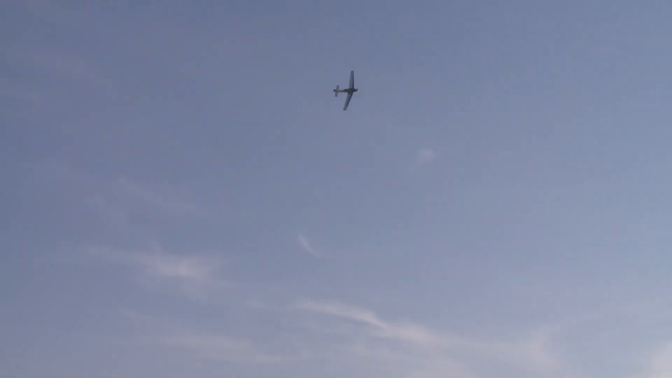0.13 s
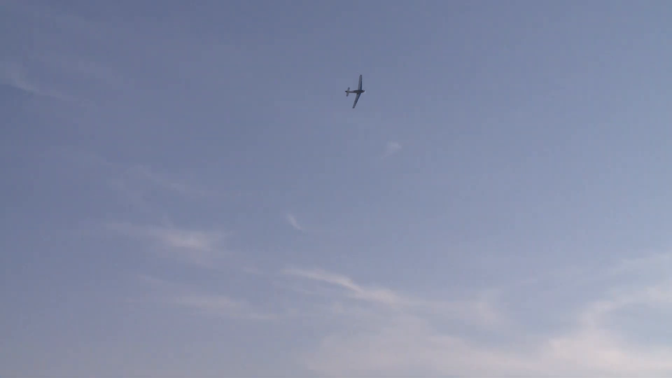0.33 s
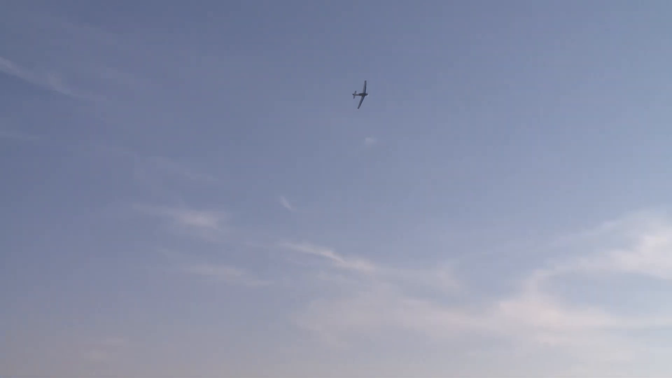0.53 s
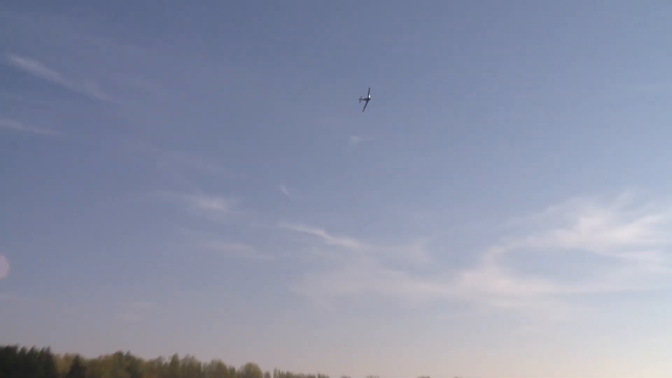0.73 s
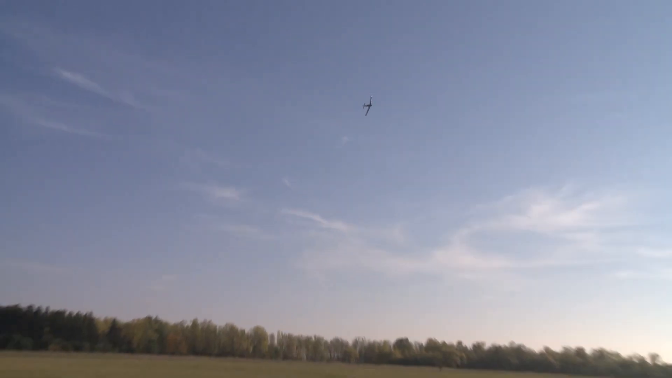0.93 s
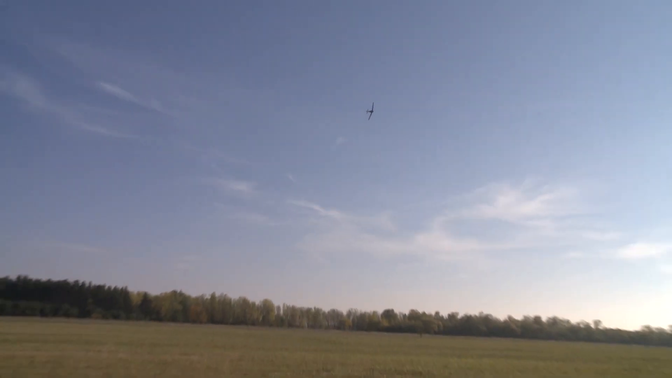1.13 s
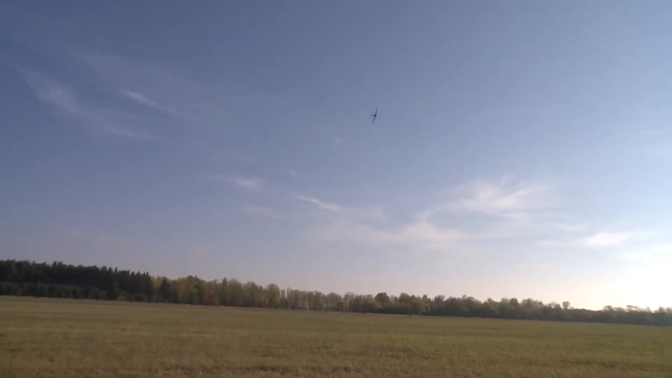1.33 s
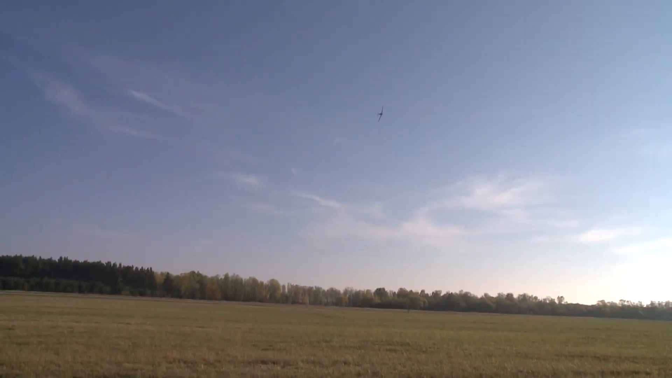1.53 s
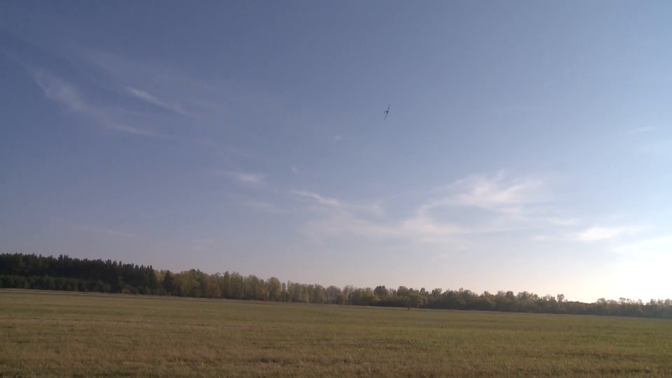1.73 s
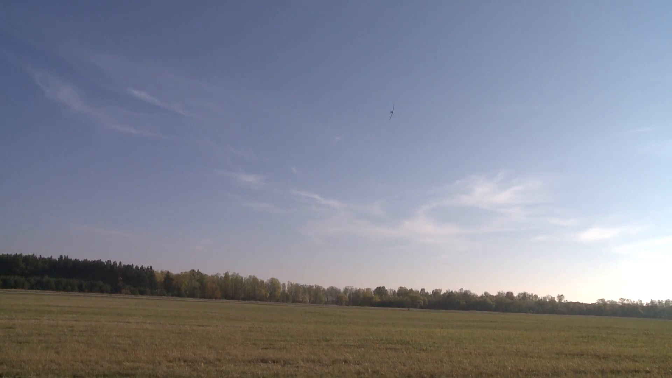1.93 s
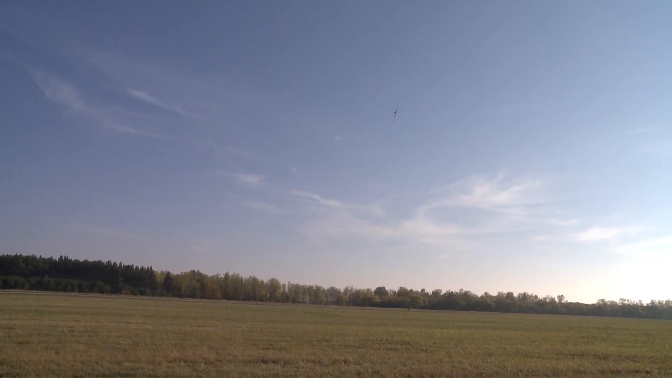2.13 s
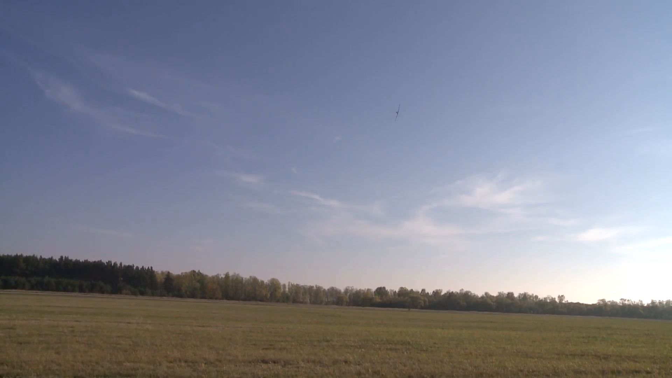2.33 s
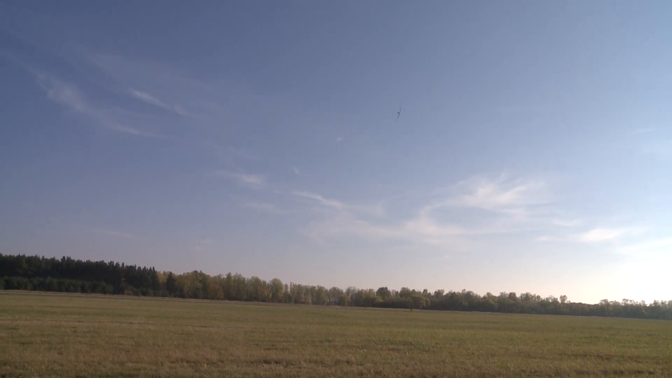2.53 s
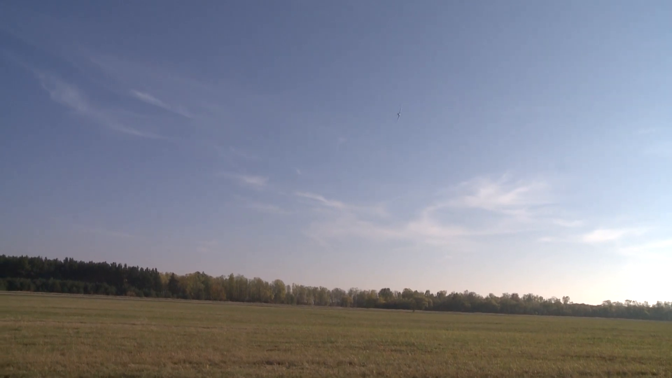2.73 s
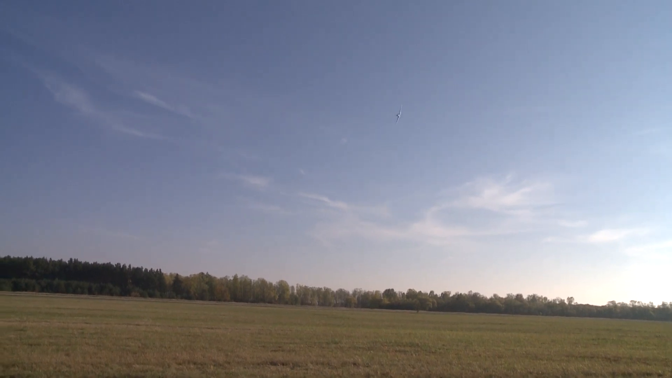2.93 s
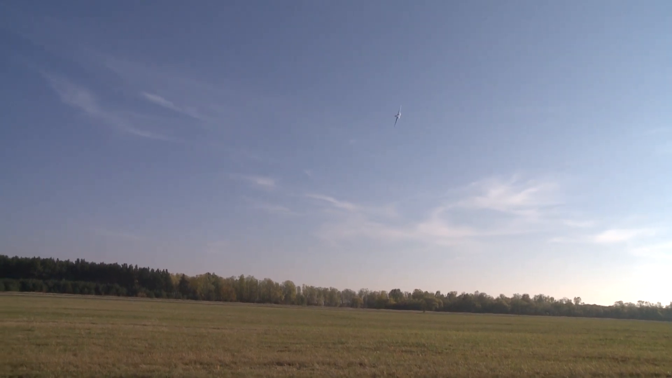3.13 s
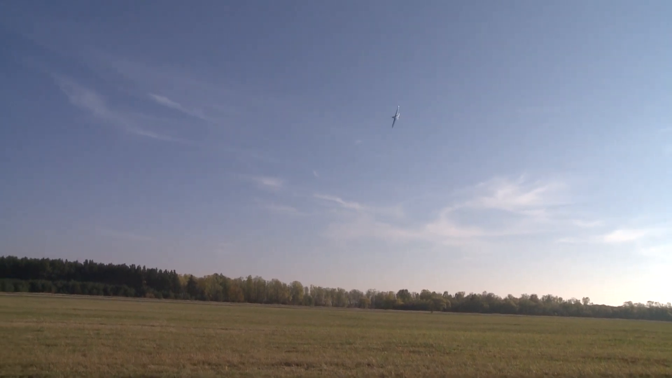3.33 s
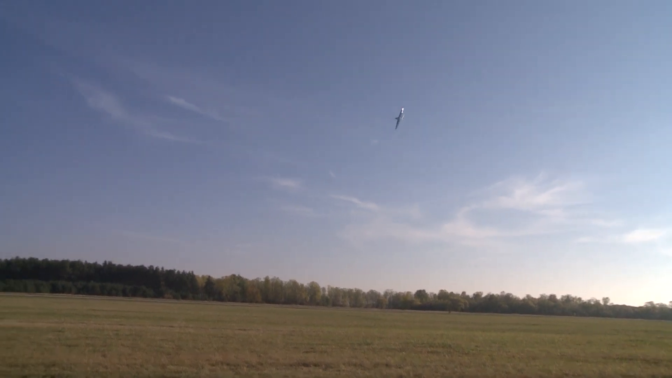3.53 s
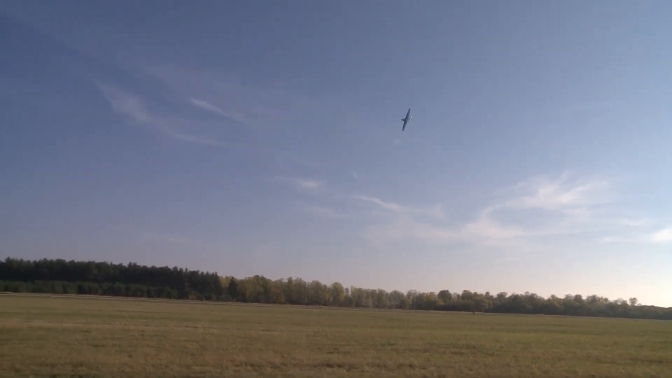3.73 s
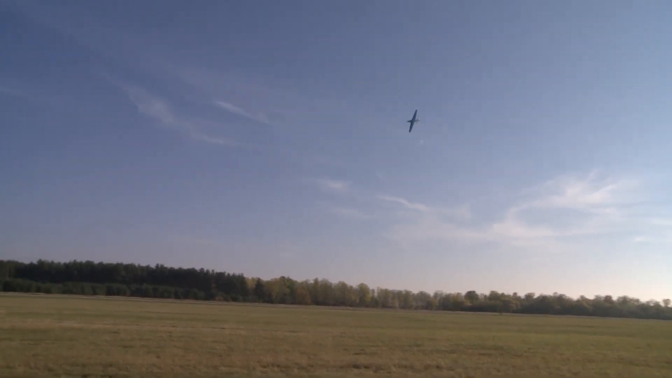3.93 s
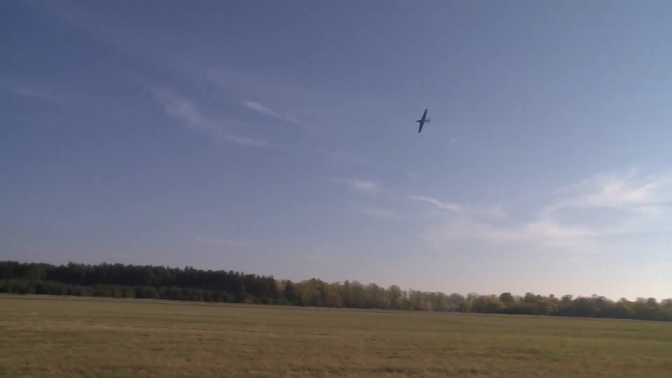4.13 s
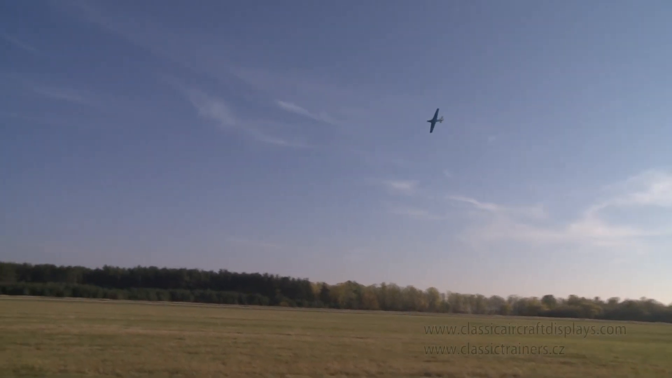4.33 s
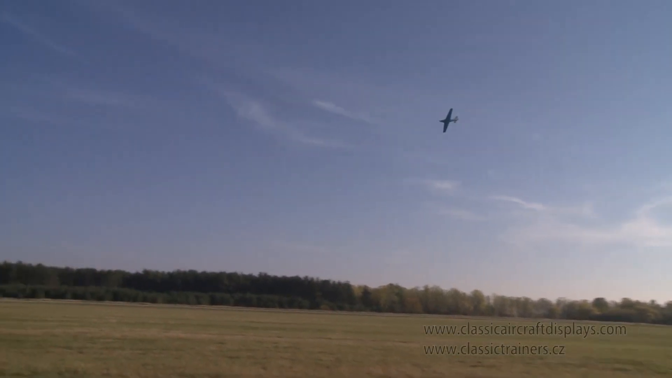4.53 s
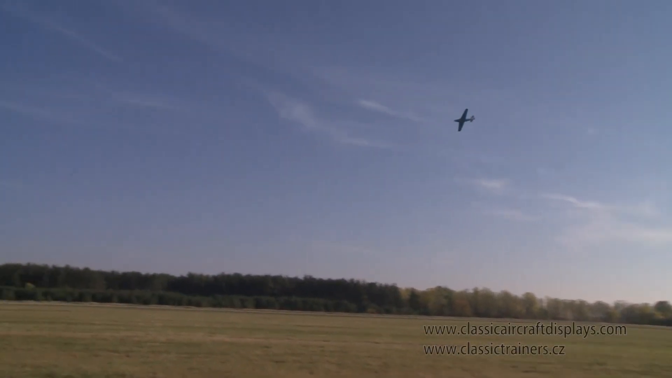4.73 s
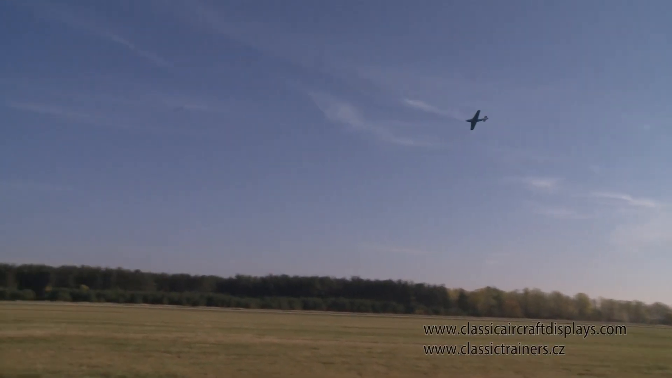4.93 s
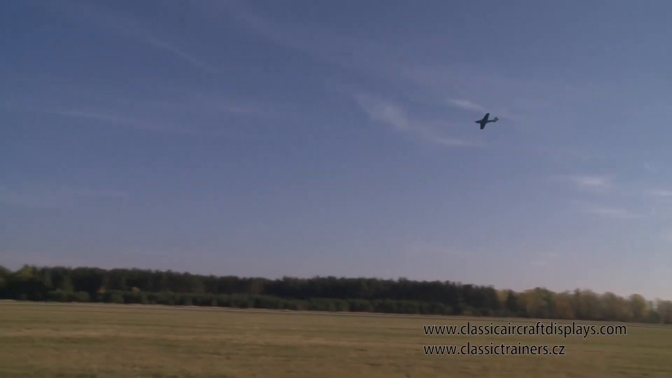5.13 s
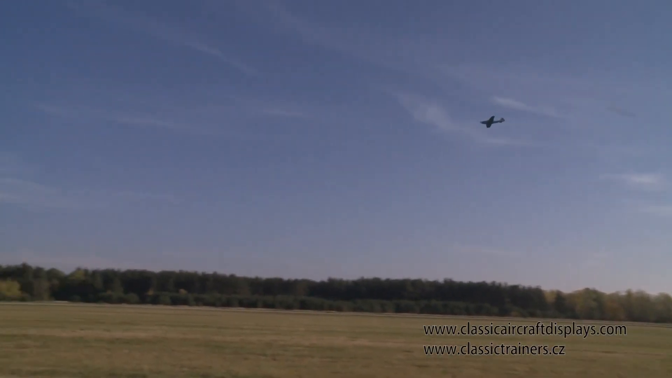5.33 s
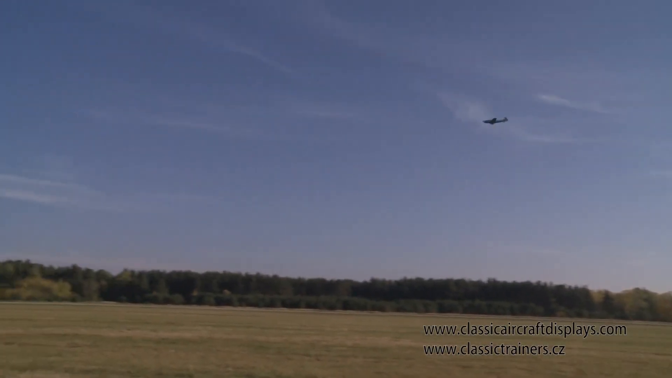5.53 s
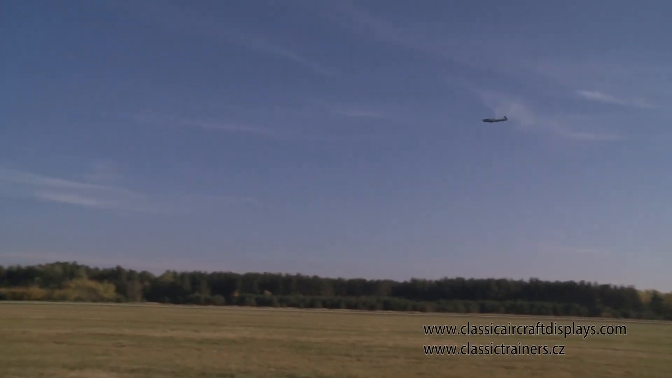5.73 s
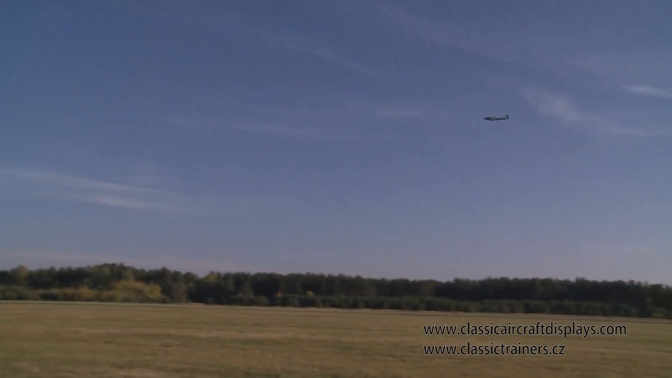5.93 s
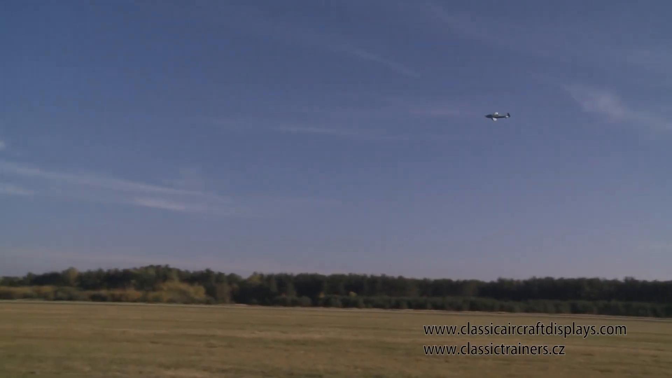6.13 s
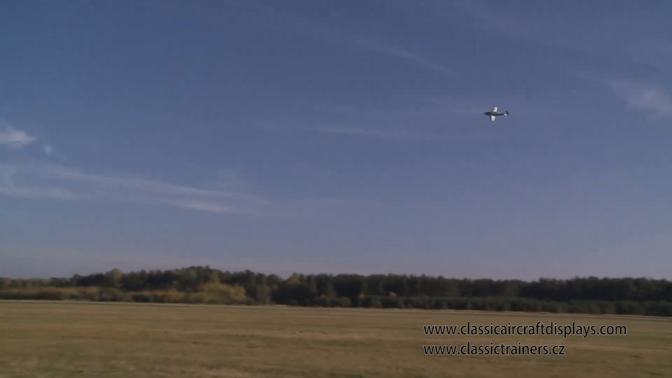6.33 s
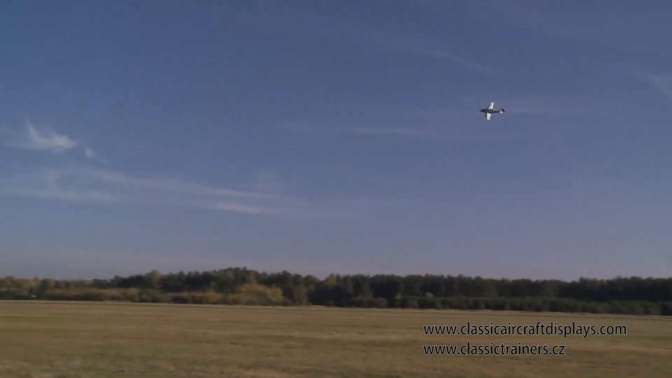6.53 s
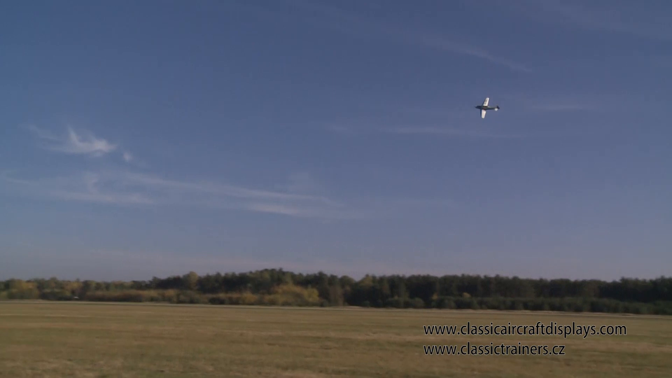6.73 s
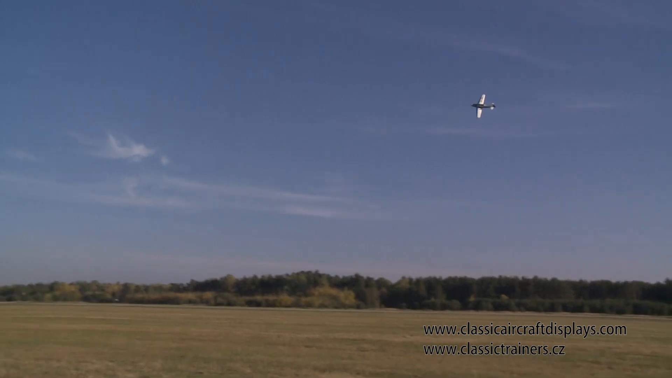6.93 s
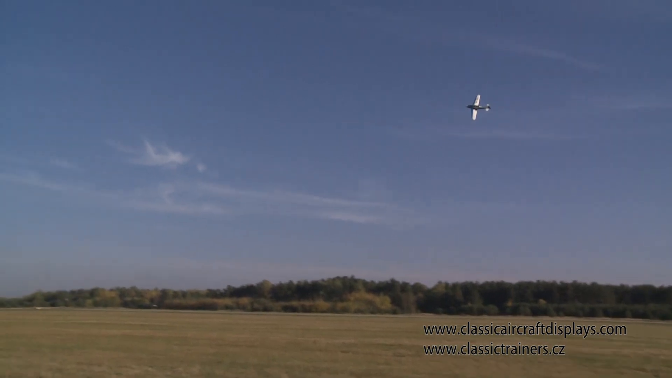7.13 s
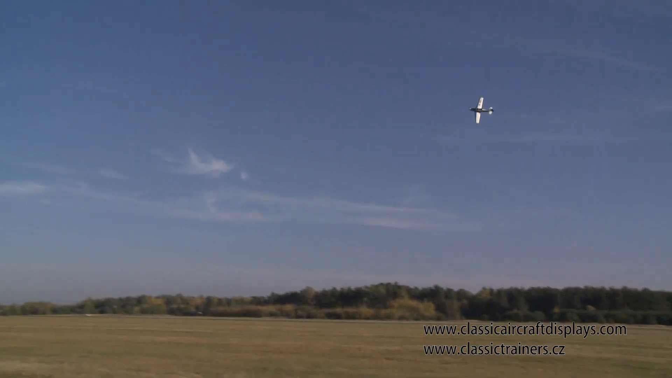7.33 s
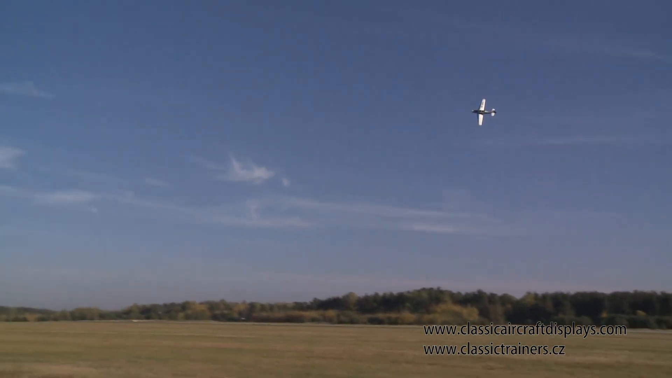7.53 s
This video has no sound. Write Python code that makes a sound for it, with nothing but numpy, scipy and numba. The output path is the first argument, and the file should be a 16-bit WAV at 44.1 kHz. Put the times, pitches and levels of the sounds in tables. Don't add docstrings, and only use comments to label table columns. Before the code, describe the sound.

Distant piston aircraft drone with rough exhaust roar rises in pitch and loudness, bangs sharply while flying past, then drops lower and eases away.

```python
import sys
import numpy as np
from scipy import signal
from scipy.io import wavfile
from numba import njit

SR = 44100
rng = np.random.default_rng(int(sys.argv[2]) if len(sys.argv) > 2 else 0)


def dump(signal):
    limited = np.clip(np.atleast_2d(signal).T, -1, 1)
    pcm = np.round(limited * 32767).astype(np.int16)
    wavfile.write(sys.argv[1], SR, pcm)


def voltage_ratio(decibels):
    exponent = np.asarray(decibels, float) / 20
    return 10 ** exponent


N = 339570


def rms_one(x):
    return x / np.sqrt(np.mean(x ** 2) + 1e-20)


def in_time(rows):
    s, *columns = np.transpose(rows)
    return [np.interp(np.arange(N) / SR, s, c) for c in columns]


def drift(rate_hz):
    r = np.exp(-80 * np.pi * rate_hz / SR)
    slow = signal.lfilter([1], [1, -2 * r, r * r], rng.standard_normal(N // 40 + 2002))
    slow = slow[2000:]
    return np.interp(np.arange(N) / 40, np.arange(len(slow)), rms_one(slow))


def band(x, low_hz, high_hz):
    return signal.sosfilt(signal.butter(3, [low_hz, high_hz], "band", fs=SR, output="sos"), x)


def delayed(x, ms):
    return np.interp(np.arange(N) - ms * SR / 1000, np.arange(N), x)


@njit
def dip(x, hz, width_hz, left, rate):
    out, r = x.copy(), np.exp(-np.pi * width_hz / rate)
    y1 = y2 = 0.
    for i in range(2, len(x)):
        y = (1 - r * r) / 2 * (x[i] - x[i - 2])
        y += (1 + r * r) * np.cos(2 * np.pi * hz[i] / rate) * y1 - r * r * y2
        out[i] = x[i] - (1 - left) * y
        y1, y2 = y, y1
    return out


def wind():
    # (time [s], level [dB])
    gust_levels = [(0, -57), (1.5, -59), (4.5, -58), (5.9, -56), (6.3, -61.5), (7.7, -42)]
    level_db, = in_time(gust_levels)
    rumble = rms_one(band(rng.standard_normal(N), 20, 99))
    return voltage_ratio(level_db + 2.8 * drift(2.7)) * rumble


def lens_motor():
    start_db, slows_s, fade_db_per_s, stops_s = -73.5, 0.87, 23, 1.4
    squeaks_hz = 57.2
    t = np.arange(N) / SR
    level_db = start_db - fade_db_per_s * np.maximum(t - slows_s, 0)
    turn = (t + 0.0011 * drift(3)) * squeaks_hz / 2 % 1
    along = np.where(turn < .4, turn / .37, (turn - .4) / .53)
    along = np.clip(along, 0, 1)
    teeth = 1 - .5 * np.cos(10 * np.pi * turn)
    swell = np.sin(np.pi * along) ** .4 * teeth
    scrape_hz = 1500 * band(rng.standard_normal(N), 80, 300)
    hz = 3870 + 320 * along + 60 * np.cos(2 * np.pi * turn) + scrape_hz
    squeak = swell * voltage_ratio(1.3 * drift(60)) * np.sin(2 * np.pi * np.cumsum(hz) / SR)
    return voltage_ratio(level_db) * rms_one(band(squeak, 3720, 4290)) * (t < stops_s)


def pockets():
    # (time [s], gain at 1 kHz [dB], half width [s])
    air_pockets = [(.36, 1, 0.063), (0.851, 1, 0.059), (1.2, 1.5, 0.067), (2.251, 2, 0.092),
                   (2.521, 1.5, 0.064), (3.201, 1.5, 0.24), (4.081, -2, 0.15), (4.339, 2, .05),
                   (4.45, -0.5, 0.045), (4.63, 1.5, 0.044), (4.922, -2, 0.062), (5.131, 0, 0.044),
                   (5.36, 1.5, 0.1), (5.57, 0.5, 0.053), (5.72, -1, 0.087), (5.9, 0.4, 0.077),
                   (3.65, 0.5, 0.12), (1.05, -1.5, 0.067), (6.182, 2, 0.049), (6.36, -1.5, 0.027),
                   (6.622, -2, 0.046), (6.838, 1.5, 0.17), (6.98, -1.5, 0.046), (7.18, 1.5, .05),
                   (7.33, -1, 0.11), (7.551, 0, 0.022)]
    t = np.arange(0, N, 64) / SR
    bumps_db = sum(db * np.exp(-((t - s) / half_s) ** 2) for s, db, half_s in air_pockets)
    return np.interp(np.arange(N) / SR, t, bumps_db)


def exhaust_puffs(cycle):
    # (strength [dB], pipe delay [firings])
    cylinders = [(3.5, 0.039), (6.5, -0.045), (1.5, 0.092), (2.5, 0.081), (-11, -0.042), (7.5, 0.034)]
    firing = np.arange(1, int(6 * cycle[-1]))
    strength_db, late = np.array(cylinders)[firing % 6].T
    luck = rng.standard_normal((len(firing), 6))
    when = firing + late - .45 + .006 * luck[:, 0]
    at = np.interp(when, 6 * cycle, np.arange(N)).astype(int)
    clicks, opening, snaps = np.zeros((3, N))
    clicks[at] = voltage_ratio(strength_db + 1.2 * luck[:, 1])
    opening[at] = voltage_ratio(.2 * strength_db + 1.5 * luck[:, 2])
    snap_at = at + (45 + 18 * luck[:, 3]).astype(int)
    snaps[np.clip(snap_at, 0, N - 1)] = voltage_ratio(3.5 * luck[:, 4]) * np.sign(luck[:, 5])
    fade = np.exp(-1 / (0.001 * SR))
    bursts = signal.lfilter([1], [1, -2 * fade, fade ** 2], opening)
    return rms_one(clicks), rms_one(snaps), rms_one(bursts)


def air_path(cycle, level_db, aside):
    # (frequency [Hz], level per Hz [dB])
    roar_colour = [(60, -12), (170, -5), (330, -3), (500, -10.5), (860, -3.5), (1260, -9.5), (1900, -7),
                   (2500, -16), (3100, -20), (3900, -19), (4700, -32), (5900, -28.5), (7600, -50),
                   (10000, -54.5)]
    # (frequency [Hz], loss per dB that distance takes off the level [dB])
    air_loss = [(150, -.4), (800, -0.02), (1900, 0.38), (2650, 0.24), (3450, 0.55), (5000, 0.6),
                (6500, 1.2), (8500, -0.5)]
    # (frequency [Hz], loss when the microphone looks fully past the plane [dB])
    aside_loss = [(450, 1), (850, 0), (1500, -2.5), (2650, 0), (3450, 14), (6500, 15)]
    close_db = -40
    colour_hz, colour_db = np.transpose(roar_colour)
    pocket_db = pockets()
    clicks, snaps, bursts = exhaust_puffs(cycle)
    white, gust, out = rng.standard_normal((2, N)), drift(18), 0
    edges = 57 * 2 ** np.arange(0, 7.8, 1 / 3)
    for k, (low, high) in enumerate(zip(edges, edges[1:])):
        hz = np.sqrt(low * high)
        loss_db = np.interp(hz, *np.transpose(air_loss)) * (level_db - close_db)
        loss_db = loss_db - np.interp(hz, *np.transpose(aside_loss)) * aside
        flicker_db = min(hz / 5000, 1.3) * 1.3 * gust + (0.96 + hz / 7000) * drift(11.5)
        flicker_db += pocket_db * (min(hz, 6000) / 1000) ** 0.69
        gated = np.clip(0.35 + 0.13 * np.log2(hz / 900), 0, .95)
        source = white[k % 2] * (1 - gated + gated * bursts)
        source += 1.4 / (1 + (hz / 600) ** 2) * clicks
        source += .55 * min(hz / 1200, 1) * snaps
        tint_db = np.interp(np.log(hz), np.log(colour_hz), colour_db)
        out = out + voltage_ratio(tint_db + loss_db + flicker_db) * band(source, low, high)
    return out


def ground_echo(x):
    # (time [s], delay [ms], share [0-1])
    ground = [(0, 2.15, .35), (1.5, 2.25, .4), (2.2, 2.43, .45), (4.7, 2.4, .4), (5.4, 2.25, .3),
              (6.5, 2.15, .35), (7.7, 2.3, .4)]
    late_ms, share = in_time(ground)
    return x + share * delayed(signal.lfilter([.55], [1, -.45], x), late_ms)


def microphone_body(x):
    # (time [s], first [Hz], second [Hz], third [Hz])
    shadows = [(0, 3600, 4650, 7470), (3, 3400, 4600, 7350), (4.2, 2950, 4720, 7200),
               (5.2, 2800, 5060, 6930), (7.7, 2844, 5020, 6800)]
    # (width [Hz], share left at the bottom [0-1])
    shadow_shape = [(420, .35), (1200, .1), (700, .4)]
    # (frequency [Hz], width [Hz], gain on top [ratio])
    cavity = [(2300, 450, 1.5), (3880, 400, 2.1), (5900, 650, 1.7), (7700, 800, 2.0)]
    for hz, (width_hz, left) in zip(in_time(shadows), shadow_shape):
        x = dip(x, hz, width_hz, left, SR)
    for hz, width_hz, gain in cavity:
        x = dip(x, np.full(N, float(hz)), width_hz, gain, SR)
    return signal.sosfilt(signal.butter(4, 10100, fs=SR, output="sos"), x)


def roar(cycle):
    # (time [s], level [dB], how far the microphone looks past the plane [0-1])
    fly_past = [(0, -54.5, 0.1), (.72, -55.5, 0), (.84, -50, 0.4), (1.4, -51, 0.7), (1.58, -54.5, 0.5),
                (1.9, -50.5, .9), (2.6, -51, 0.9), (3.0, -48, 0.8), (3.45, -41.5, 1), (3.95, -39, 0.6),
                (4.3, -40, 0.4), (5.1, -39, 0.2), (5.5, -37.5, 0.2), (6.2, -39, -.1), (6.5, -40, 0.05),
                (7.0, -42, .1), (7.7, -42, -.1)]
    level_db, aside = in_time(fly_past)
    out = microphone_body(ground_echo(air_path(cycle, level_db, aside)))
    return voltage_ratio(level_db) * out / np.std(band(out, 430, 2200))


def cracks():
    # (time [s], peak level [dB], ring [Hz])
    late_burns = [
        (3.263, -32.5, 2250),
        (4.1007, -37, 1200),
        (4.601, -33, 1790),
        (5.259, -35, 1900),
        (5.324, -40, 1500),
        (5.386, -22, 1820),
        (5.417, -28, 1500),
        (5.48, -21.5, 1780),
        (5.7625, -24, 1830),
        (6.3944, -39.5, 1940),
    ]
    out, t = np.zeros(N), np.arange(400) / SR
    swell = ((t / 0.00083) * np.exp(1 - t / 0.00086)) ** 2
    for s, peak_db, ring_hz in late_burns:
        at = round(s * SR)
        out[at:at + len(t)] += voltage_ratio(peak_db) * np.sin(2 * np.pi * ring_hz * t) * swell
    return out


def tone(cycle, order, level_db, shake_db, turn=0):
    wobble = .009 * order * drift(5)
    level = np.sqrt(2) * voltage_ratio(level_db + shake_db * drift(3.3))
    return level * np.cos(2 * np.pi * order * cycle + wobble + turn)


def exhaust_tones(cycle, cycle_hz):
    # (time [s], firing level [dB], sharpness as its overtone below that [dB])
    exhaust_note = [(0, -42, -18), (.75, -39, -27), (1.2, -39, -29.5), (1.65, -43, -23),
                    (2.4, -40.5, -17.5), (2.75, -41.5, -13), (3.74, -39, -14.5), (4.18, -35, -11),
                    (4.55, -33.5, -7), (5.28, -31.5, -10.5), (6.1, -29.5, -10.5), (6.38, -33.5, -13),
                    (6.6, -32, -25), (7.04, -36.5, -8), (7.7, -37.5, -10.5)]
    firing_db, sharp_db = in_time(exhaust_note)
    second_db = firing_db + sharp_db
    bank_db = firing_db - 24.5 + 3 * (cycle_hz - 20)
    turn = np.pi * np.clip((cycle_hz - 21.2) / 1.3, 0, 1)
    out = tone(cycle, order=6, level_db=firing_db, shake_db=.5)
    out += tone(cycle, order=12, level_db=second_db, shake_db=0.03, turn=turn)
    out += tone(cycle, order=18, level_db=second_db - 19, shake_db=1.2)
    for order, rel_db in ((3, -16), (9, -3.5), (15, 1.5)):
        out += tone(cycle, order=order, level_db=bank_db + rel_db, shake_db=1.2)
    return out


def propeller(cycle):
    # (time [s], blade pass level [dB], snap as its fifth overtone below that [dB])
    blades = [(0, -63, 6), (.22, -49.5, -10), (.7, -45.5, -16), (1.4, -48, -18.5), (1.8, -48, -30),
              (2.1, -44, -30.5), (2.75, -46, -23), (3.96, -42, -36), (4.84, -45, -11.5), (5.06, -40.5, -16),
              (5.4, -38.5, -10.5), (6.16, -38.5, -10.5), (6.82, -38.5, -9.5), (7.7, -34.5, -17)]
    upper_db = [3, -4, -12, -7, -5, -10.5]
    pass_db, snap_db = in_time(blades)
    cycle = cycle + .035 * drift(.4)
    out = tone(cycle, order=4, level_db=pass_db, shake_db=0.0)
    out += tone(cycle, order=8, level_db=pass_db + .9 * snap_db, shake_db=-0.5, turn=1)
    out += tone(cycle, order=16, level_db=pass_db + 1 + 0.7 * snap_db, shake_db=-0.5)
    for step, rel_db in enumerate(upper_db):
        level_db = pass_db + snap_db + rel_db
        out += tone(cycle, order=20 + 4 * step, level_db=level_db, shake_db=1.5, turn=(step + 1) / 2)
    return out


def aircraft():
    # (time [s], speed [cycles/s])
    engine_speed = [(0, 20.06), (.66, 20.76), (1.1, 21.25), (2.64, 23.09), (3.08, 23.53), (3.4, 23.74),
                    (3.74, 23.86), (3.96, 23.81), (4.29, 23.58), (4.62, 23.15), (4.95, 22.6), (5.39, 21.62),
                    (5.72, 21.05), (6.38, 20.19), (6.71, 19.88), (7.15, 19.63), (7.48, 19.55), (7.7, 19.66)]
    cycle_hz, = in_time(engine_speed)
    cycle = np.cumsum(cycle_hz) / SR
    return roar(cycle) + cracks() + exhaust_tones(cycle, cycle_hz) + propeller(cycle)


def scene():
    live = 2 * (wind() + lens_motor() + aircraft())
    return np.array([0 * live, live])


def low_pass(x):
    return signal.sosfilt(signal.butter(12, 12000, fs=SR, output="sos"), x)


def record(dry):
    hiss_db = -86.5 + np.array([[0], [4]])
    hiss = voltage_ratio(hiss_db) * rng.standard_normal((2, N))
    return low_pass(dry + hiss + voltage_ratio(-85))


dry = scene()
out = record(dry)
dump(out)
```